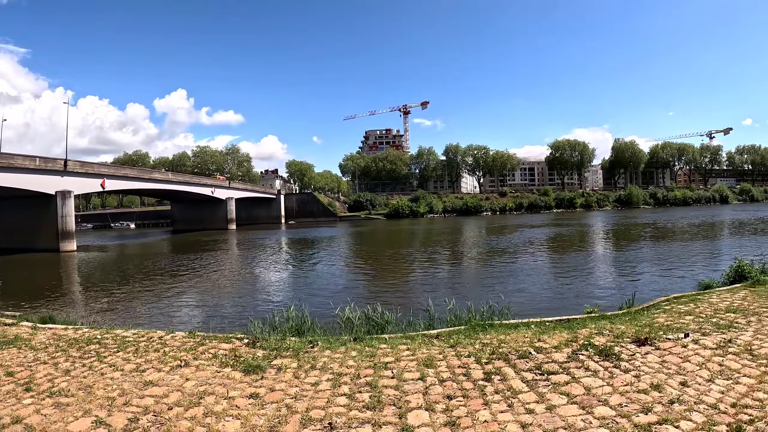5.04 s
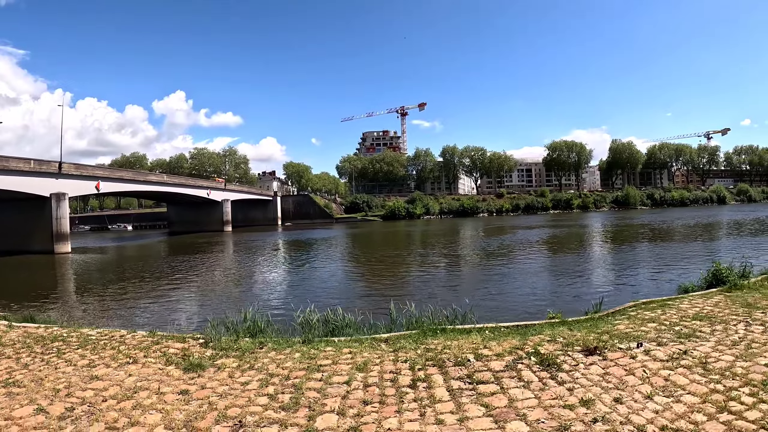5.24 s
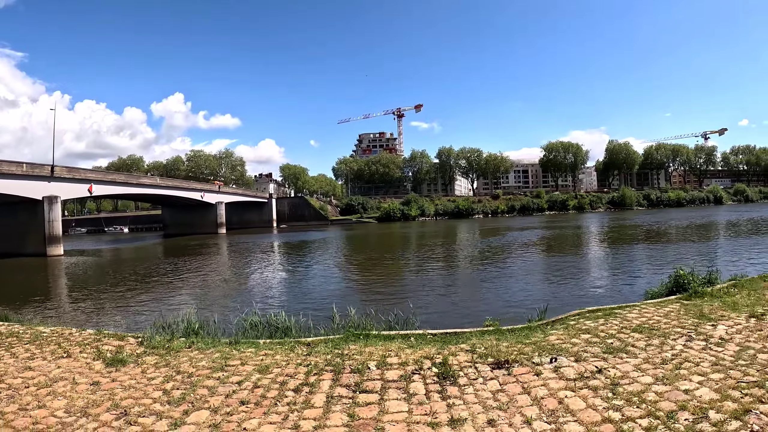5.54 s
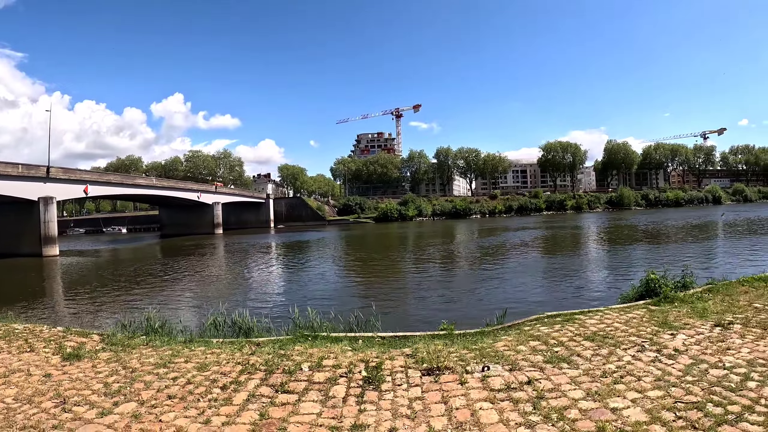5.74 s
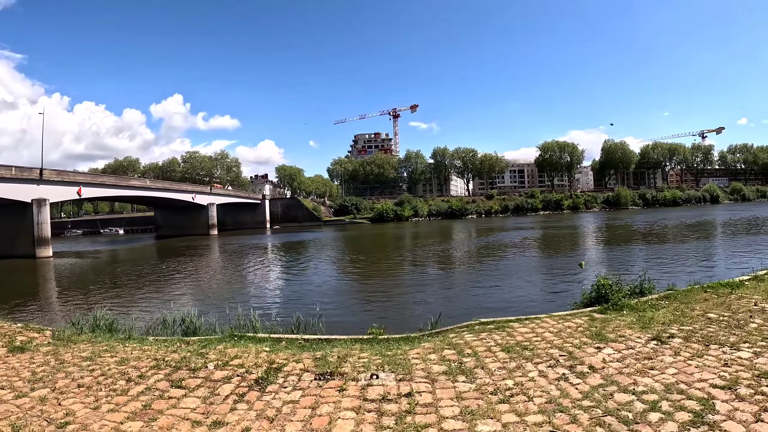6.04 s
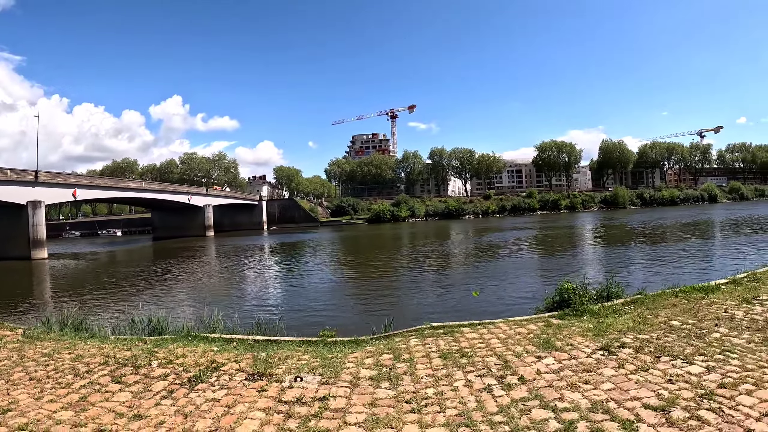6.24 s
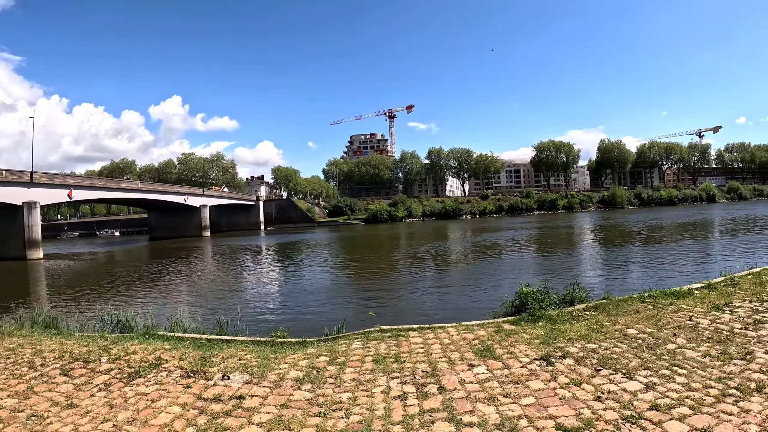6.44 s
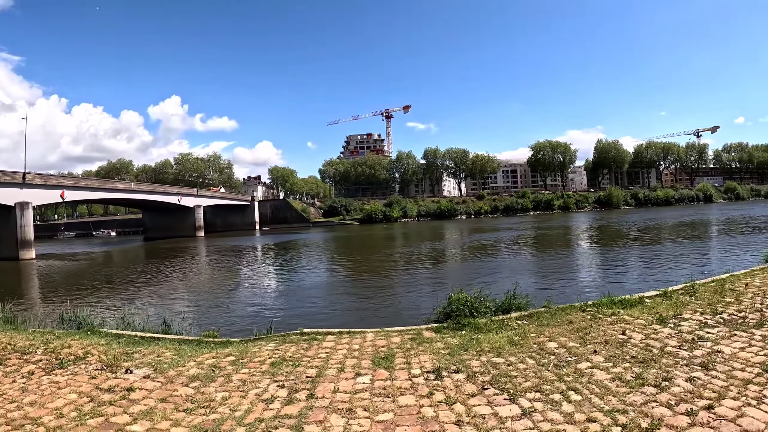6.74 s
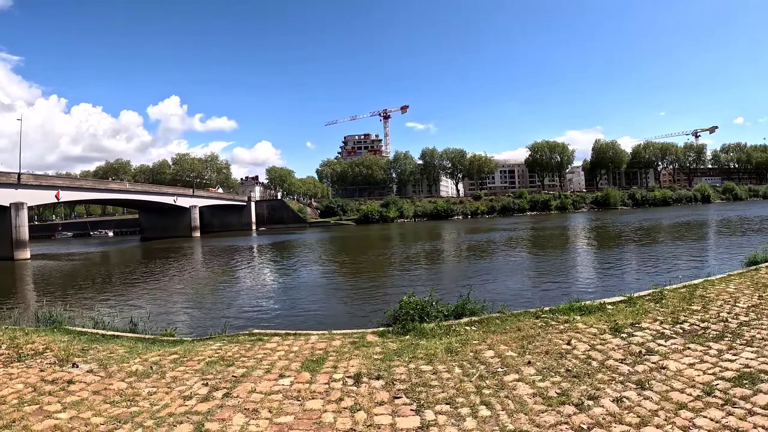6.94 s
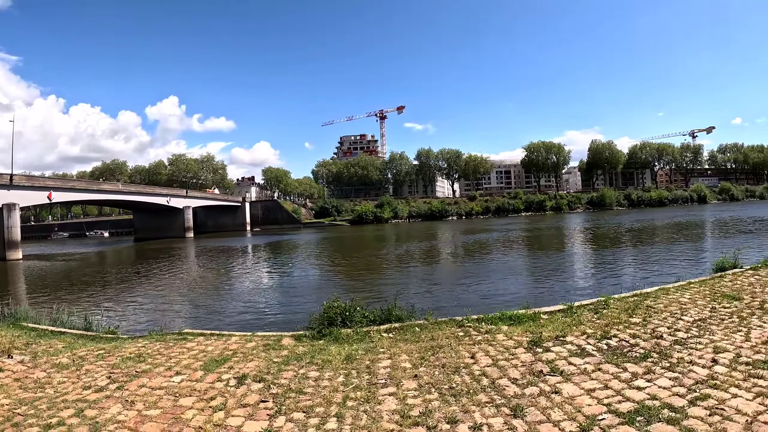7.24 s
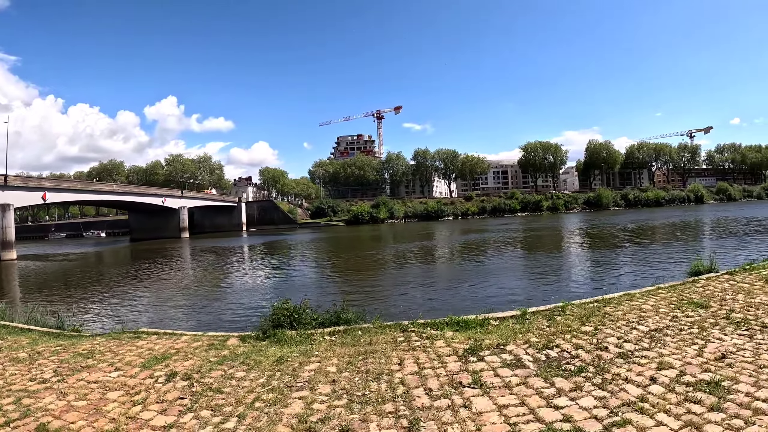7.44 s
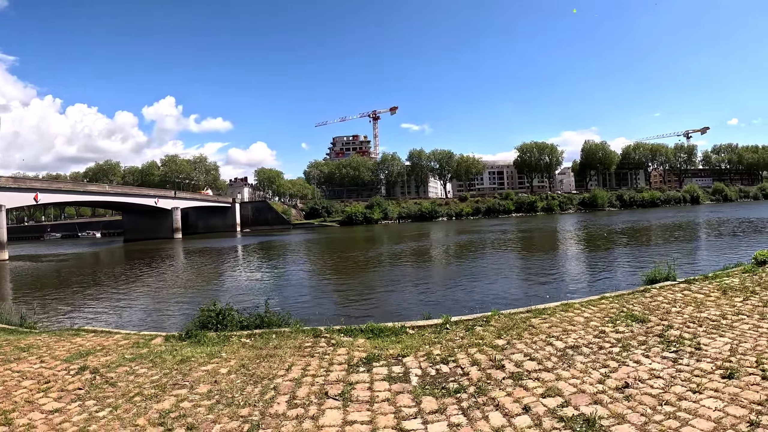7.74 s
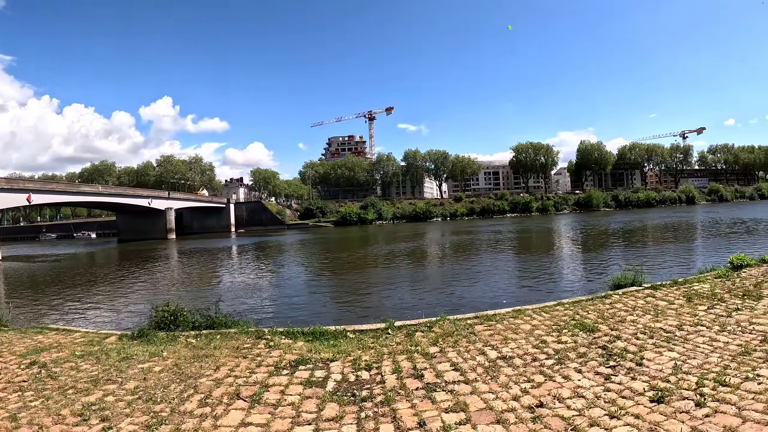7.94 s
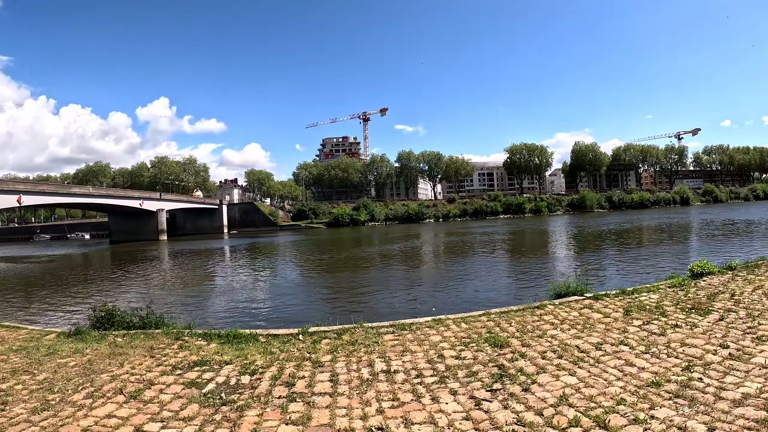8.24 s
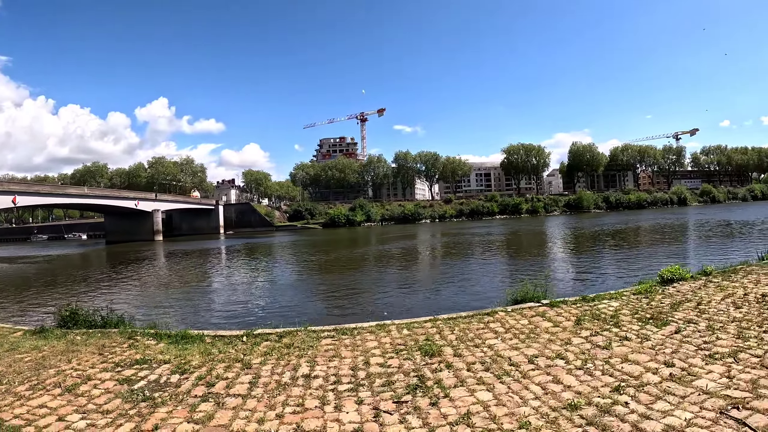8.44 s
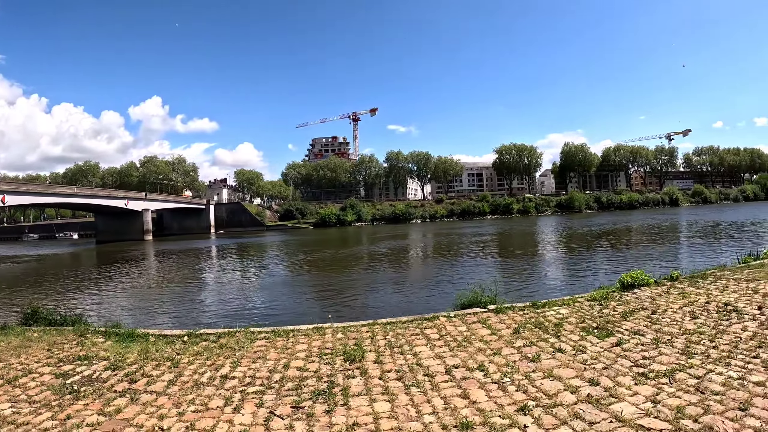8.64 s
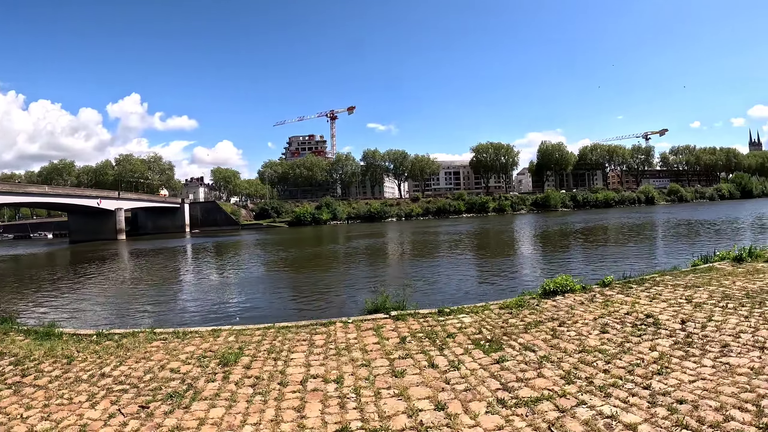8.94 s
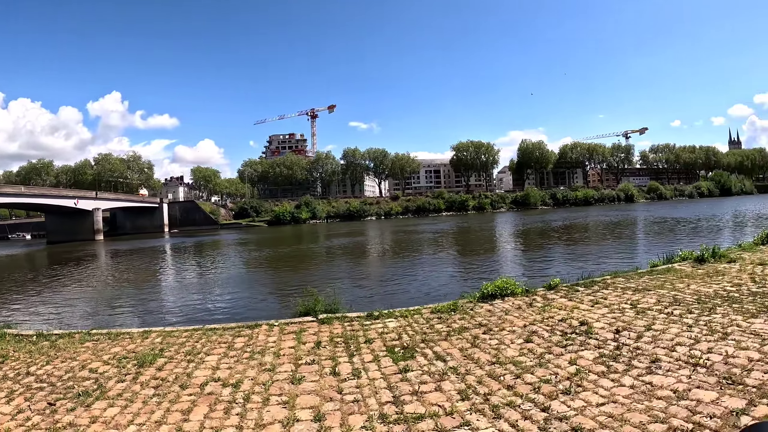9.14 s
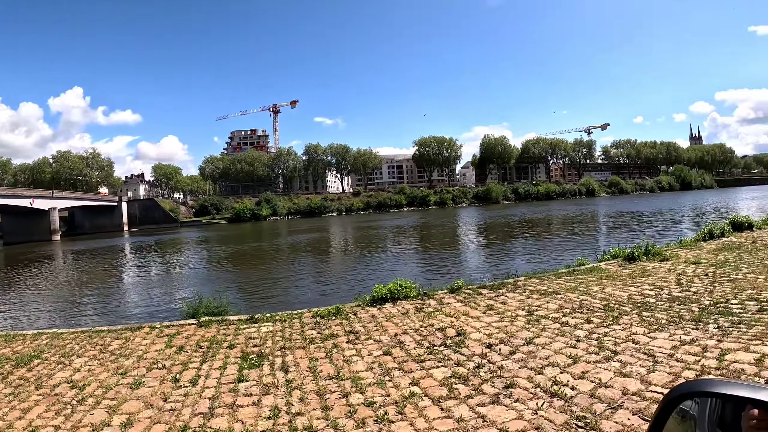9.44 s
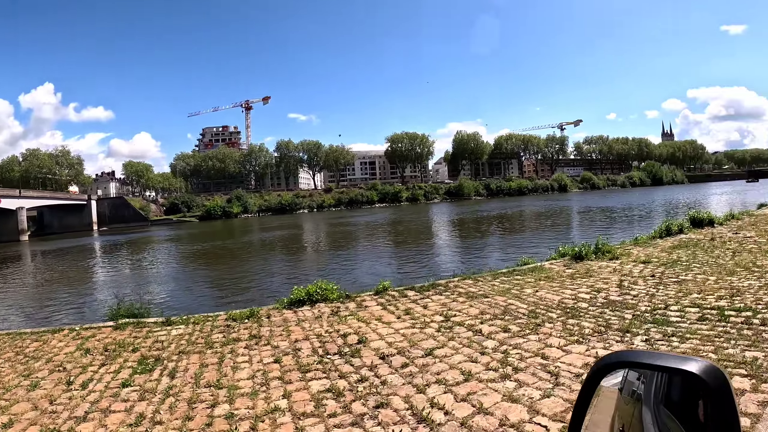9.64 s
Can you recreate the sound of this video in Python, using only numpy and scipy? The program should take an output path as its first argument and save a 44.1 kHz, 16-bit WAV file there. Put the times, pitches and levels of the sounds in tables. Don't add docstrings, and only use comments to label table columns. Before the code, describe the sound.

From inside a car with an open window, a faint low engine hum emerges from silence. Around two seconds the wheels begin to roll harder over cobblestones: booming bass, stony rumble, tyre roar and gritty hiss. Thumps, hollow knocks and a sharp metallic click punctuate it, while the engine climbs steadily. The close microphone is slightly overloaded by the bass.

```python
import sys
import numpy as np
from scipy import signal
from scipy.io import wavfile
from scipy.ndimage import uniform_filter1d

SR = 44100
rng = np.random.default_rng(int(sys.argv[2]) if len(sys.argv) > 2 else 0)


def to_wav(sig):
    pcm = np.clip(np.atleast_2d(sig), -1, 1) * 32767
    pcm = np.round(pcm).astype(np.int16)
    wavfile.write(sys.argv[1], SR, pcm.T)


def decibels_to_gain(level_db):
    exponent = np.asarray(level_db, float) / 20
    return 10 ** exponent


N = 432180
T = np.arange(N) / SR

# t/s, tyre roar level/dB, roughness level/dB
ROAD_LEVELS = [(0, -91, -71), (0.11, -62, -49.5), (0.3, -58.5, -46), (1.03, -53.5, -41), (1.5, -47.5, -40),
               (2.07, -41.5, -30.5), (2.45, -40, -27.5), (2.8, -40.5, -31), (3.35, -36.5, -31.5),
               (3.8, -37.5, -27), (4.3, -41.5, -30.5), (5.2, -44.5, -33), (5.6, -39.5, -29),
               (6.6, -39, -34.5), (7.3, -36, -31.5), (8.28, -43, -31.5), (8.43, -39, -29.5),
               (9.8, -44.5, -30.5)]
# f/Hz, width/Hz, level/dB
SPRING_MODES = [(16.14, 6.46, -5), (26.16, 13.6, -9), (10.3, 12.4, -7.5)]
# t/s, lift/dB, half length/s
BODY_HEAVES = [(0.44, 12, 0.082), (1.03, 6, 0.084), (1.45, 9.5, 0.08), (2.09, 4.5, 0.19), (2.29, 1, 0.023),
               (0.3, 4, .08), (0.92, 7, 0.04), (2.64, 6, 0.062), (2.98, 11, 0.034), (3.6, 2.5, 0.13),
               (3.98, 7, 0.073), (4.15, 11, 0.062), (4.45, 8, 0.14), (4.86, 10.5, 0.27), (5.38, 2, 0.055),
               (5.59, 8, 0.056), (5.83, 7, 0.11), (6.22, 6.5, 0.22), (6.52, 7, 0.27), (6.95, 5.5, 0.1),
               (7.3, 2.5, 0.38), (7.7, 7.5, 0.15), (8.13, 0.5, 0.055), (8.33, 9, 0.054), (8.79, 6.5, 0.11),
               (9.33, 6.5, 0.069), (9.72, 10.5, 0.024)]
# t/s, lift/dB, half length/s
STONE_RUNS = [(1.42, 3.5, 0.17), (2.07, 2, .06), (2.35, -4.5, 0.079), (2.67, 4, 0.076), (2.9, 10, 0.083),
              (3.14, 9.5, .04), (3.28, 10, 0.069), (3.72, 1.5, 0.07), (4.09, 5, 0.039), (4.31, 0, 0.04),
              (4.86, 8, 0.032), (5.45, 2.5, .08), (5.7, 8, 0.043), (5.95, 7.5, 0.063), (6.19, 4, .05),
              (6.35, 7.5, 0.042), (6.75, 1.5, 0.025), (7.3, 4.5, 0.24), (7.8, 0, .06), (8.14, 3, 0.058),
              (8.37, 2.5, 0.19), (9.2, 1.5, 0.25), (9.42, 0, 0.079), (9.64, 2, 0.094)]
# t/s, lift/dB, half length/s
SANDY_STRETCHES = [
    (2.4, 3, 0.17),
    (3.62, 1.5, 0.14),
    (5.7, 0.5, 0.46),
    (6.65, 2, 0.39),
]
# t/s, lift/dB, half length/s
ROAR_SWELLS = [
    (3.4, 2, 0.037),
    (3.48, 2, 0.033),
    (8.4, 1, 0.026),
    (8.5, 2, 0.05),
    (2.1, 3, 0.035),
    (7.3, 0.5, 0.056),
]
# t/s, lift/dB, half length/s
RATTLE_BURSTS = [(1.485, 12, .02), (1.525, 12, .025), (1.575, 11, .03), (1.63, 6, .02), (2.09, 6, .03),
                 (2.428, 21, 0.026), (2.51, 8, .03), (3.47, 10, .02), (3.89, 6, .02), (4.03, 6, .02),
                 (4.545, 11, .02), (5.5, 6, .02), (5.82, 4, .03), (7.3, 8, .025), (7.615, 7, .02)]
# f/Hz, density level/dB per Hz
RUMBLE_SPECTRUM = [(25, -26.5), (40, 8.5), (90, -0.5), (140, -2), (220, -7), (300, -11), (450, -21),
                   (800, -26.5), (1500, -70.5)]
# f/Hz, density level/dB per Hz
ROAR_SPECTRUM = [(180, -22), (300, -6), (636, -10), (779, -11.5), (857, -8), (1220, -11), (1730, -17.5),
                 (1890, -15.5), (2380, -24), (3000, -28.5), (3900, -61.5), (6600, -120)]
# f/Hz, density level/dB per Hz
GRIT_SPECTRUM = [(1500, -17), (2500, -5.5), (3000, -0.5), (3800, -3.5), (5700, -14.5), (6500, -15.5),
                 (7500, -22.5), (8500, -17), (9300, -27), (11000, -34), (11600, -72.5), (17000, -98.5)]
# f/Hz, density level/dB per Hz
RATTLE_SPECTRUM = [(2500, -18.5), (4500, -3), (8500, -4), (11000, -13), (11800, -29.5), (15500, -26.5),
                   (17000, -69)]
# t/s, peak level/dB, f/Hz
WHEEL_THUMPS = [(2.614, -17, 136), (2.802, -4, 110), (2.858, -7, 90), (2.901, -24, 110), (2.926, -4.5, 124),
                (3.024, -23, 137), (3.152, -17, 108), (3.245, -26, 110), (3.299, -11, 110),
                (3.592, -27, 116), (3.932, -12, 113), (5.489, -27, 118), (5.677, -11, 110),
                (5.838, -7.5, 146), (5.901, -11, 110), (5.929, -16, 129), (5.957, -1.5, 130),
                (5.553, -6, 150), (6.191, -1.5, 100), (6.231, -5, 95), (6.312, -7, 110), (6.358, -10, 110),
                (6.961, -5.5, 127), (7.097, -42, 129), (8.363, -9, 138), (8.41, -6.5, 130),
                (8.778, -31, 141), (9.297, -4.5, 110), (1.987, -27, 160), (2.235, -27, 186),
                (2.994, -9.5, 250), (3.107, -17, 186), (3.122, -14, 230), (3.223, -5.5, 150),
                (3.622, -22, 172), (3.972, -17, 230), (4.183, -12, 186), (4.72, -18, 190),
                (4.809, -17, 180), (4.838, -19, 196), (5.091, -15, 160), (5.121, -19, 175),
                (5.655, -14, 200), (5.693, -22, 220), (5.785, -19, 240), (5.945, -25, 260),
                (5.965, -14, 280), (5.984, -21, 240), (6.292, -22, 240), (6.848, -18, 250),
                (7.606, -14, 196), (7.949, -16, 250), (7.986, -17, 156), (8.616, -23, 290),
                (8.678, -12, 250), (9.394, -16, 250), (9.573, -20, 260)]
# t/s, peak level/dB, ring f/Hz, level/dB of the rattle after the blow
TRIM_KNOCKS = [(1.516, -22.5, 920, -16), (1.752, -14.5, 1110, -7), (1.952, -25, 790, -18),
               (2.172, -18.5, 1040, -10), (2.431, -18.5, 900, -3), (2.462, -28, 720, 4),
               (2.608, -24, 840, 7.5), (2.769, -20.5, 926, -11), (3.044, -19, 560, -2),
               (3.142, -24, 436, -12), (3.253, -13, 480, -9), (3.273, -10, 403, -15), (3.326, -18, 420, -4),
               (3.397, -26, 980, 7.5), (3.473, -32, 770, 0), (3.861, -12.5, 900, -3.5),
               (3.863, -11, 454, -7.5), (3.95, -22, 382, -3), (4.185, -25, 500, -12),
               (4.335, -24, 450, -10), (4.81, -22, 380, -13), (4.899, -19.5, 560, -9),
               (3.99, -16.5, 520, -7.5), (4.021, -12, 413, -15), (4.764, -24, 394, -12),
               (4.898, -21, 930, 3), (5.505, -21, 450, -6), (5.681, -10.5, 637, -12),
               (5.845, -17.5, 360, -4), (5.935, -10, 432, -9), (5.947, -19, 400, -10),
               (5.973, -21, 453, -4), (6.347, -27, 552, -7), (6.357, -15, 340, -11), (7.056, -23, 800, -4),
               (8.392, -15.5, 400, -18)]
# t/s, peak level/dB, top end level/dB
LOOSE_TICKS = [(1.263, -50, -40), (1.519, -46, -20), (1.6286, -46.5, -20), (1.7522, -34, -22),
               (2.0938, -40, -30), (1.475, -48, -17), (2.416, -28, -19), (2.428, -29, -21),
               (2.4317, -25, -17), (2.4527, -37, -18), (2.502, -47, -9), (2.52, -48.5, -8),
               (2.5576, -39.5, -27), (3.047, -40, -33), (3.3, -42, -27), (3.393, -38, -23),
               (3.4654, -39, -16), (3.474, -31, -23), (3.862, -40, -17), (3.885, -37.5, -16.5),
               (4.029, -42, -14), (4.537, -38.5, -29), (4.55, -42, -22), (4.7283, -44, -20),
               (5.808, -43, -16), (7.2824, -41, -26), (7.613, -35, -18), (8.04, -42.5, -17),
               (9.0987, -40.5, -30), (9.5167, -45, -13), (1.2377, -60, -40), (1.658, -52, -22),
               (2.1277, -44, -25), (2.1716, -48, -25), (2.461, -40, -22), (2.4965, -50.5, -8),
               (2.511, -46, -14), (3.2816, -41, -25), (4.0074, -41, -20), (4.3192, -48, -9),
               (4.569, -45, -25), (4.9009, -47, -20), (6.3855, -49, -25), (7.292, -43, -20),
               (7.304, -42, -21), (7.313, -44, -18), (7.415, -47, -20), (7.443, -43, -20),
               (7.607, -40, -25), (7.622, -43, -18), (9.7294, -53, -20)]
# t/s, peak level/dB, ring f/Hz, t60/s
METAL_CHINKS = [(2.07, -55, 6100, 0.055), (2.094, -36, 3200, 0.022), (2.4318, -17.5, 4440, 0.006),
                (2.437, -35, 3500, .015), (2.4315, -23, 5500, 0.008), (2.455, -35, 4270, .015),
                (1.263, -48, 3960, .015), (1.752, -24, 1500, 0.04), (4.899, -31, 1350, .03),
                (2.173, -31, 1030, .035), (5.6, -32, 800, .02), (3.474, -30, 750, 0.018),
                (1.598, -54, 5200, 0.014), (1.659, -52, 4500, .015), (4.03, -47, 4200, 0.015),
                (4.102, -50, 3570, .03), (4.317, -44, 5200, 0.021), (4.536, -38.5, 3100, 0.032),
                (7.283, -51, 4940, .02)]
# t/s, firing rate f/Hz
FIRING_RATE = [(0.0, 46.11), (0.6, 45.35), (1.3, 44.1), (2.0, 43.56), (2.7, 44.62), (3.3, 47.2),
               (3.9, 49.43), (4.5, 51.94), (5.2, 54.97), (6.0, 58.69), (6.9, 61.92), (7.8, 64.71),
               (8.8, 66.48), (9.8, 67.34)]
# t/s, hum level/dB, intake ring level/dB
ENGINE_EFFORT = [(0, -92, -110), (0.1, -60, -86), (0.25, -39, -70.5), (1.4, -39, -61.5), (2.0, -32, -53.5),
                 (2.6, -27, -53), (3.0, -26, -48.5), (3.5, -25.5, -44), (4.2, -25, -49.5),
                 (4.7, -27.5, -48), (5.4, -27, -54), (5.9, -24.5, -46), (6.6, -23, -50), (7.0, -21, -45),
                 (7.5, -21.5, -48), (8.2, -22.5, -45), (8.9, -21.5, -46), (9.8, -23.5, -49)]
# f/Hz, level/dB
SHELL_RESPONSE = [(85, 18), (135, 2), (170, -7), (188, -2), (200, -19), (220, 5), (265, 1.5), (330, -6),
                  (400, -6.5), (470, -5.5), (530, -20), (700, -19)]
# f/Hz, width/Hz, level/dB
PIPE_MODES = [(779, 63, 3), (1178, 90, -10)]
# from t/s, to t/s, share of strips
TOP_SURVIVES = [(1.47, 1.65, .6), (1.74, 1.78, .9), (1.93, 2.1, .5), (2.36, 2.72, .9), (2.83, 2.92, 1),
                (2.92, 2.98, .5), (3.2, 3.75, .35), (4.0, 4.1, .6), (4.2, 4.65, .45), (4.85, 5.55, .4),
                (5.64, 5.72, .4), (5.8, 5.93, 1), (6.17, 6.24, 1), (6.45, 6.6, .4), (7.27, 7.33, .4),
                (7.52, 7.67, .35), (7.9, 8.1, .6), (8.2, 8.35, .45), (8.37, 8.45, 1), (8.45, 8.55, .6),
                (8.67, 8.72, .4), (8.8, 8.82, 1), (8.84, 8.92, .4), (9.2, 9.3, .4), (9.37, 9.55, .7),
                (9.6, 9.73, .6)]


def evened(x):
    return x / np.sqrt(np.mean(x ** 2) + 1e-20)


def curves(rows):
    s, *columns = np.transpose(rows)
    return [np.interp(T, s, c) for c in columns]


def lifts(rows):
    return sum(db * np.exp(-((T - s) / max(half, 0.02)) ** 2) for s, db, half in rows)


def add(mix, s, sound):
    part = mix[round(s * SR):][:len(sound)]
    part += sound[:len(part)]


def resonate(x, hz, width_hz):
    turn = np.exp(2j * np.pi * hz * np.arange(len(x)) / SR)
    r = np.exp(-np.pi * width_hz / SR)
    return 2 * (turn * signal.lfilter([1 - r], [1, -r], x / turn)).real


def band(x, lo_hz, hi_hz):
    sos = signal.butter(2, [lo_hz, min(hi_hz, 20000)], "band", fs=SR, output="sos")
    y = signal.sosfilt(sos, x)
    return y / abs(y).max()


def wander(hz):
    smoother = signal.butter(1, hz, fs=SR / 100, output="sos")
    coarse = signal.sosfiltfilt(smoother, rng.standard_normal(N // 100 + 2))
    return np.interp(np.arange(N) / 100, np.arange(len(coarse)), evened(coarse))


def noise(spectrum, patchy_db, flicker_db, size):
    hz = np.fft.rfftfreq(size, 1 / SR)
    frames = 4 * N // size + 5
    a, b, patches = rng.standard_normal((frames, len(hz), 3)).T
    patches = uniform_filter1d(patches, size=8, axis=0)
    patches = evened(uniform_filter1d(patches, size=6, axis=1))
    flicker = evened(uniform_filter1d(rng.standard_normal(frames), size=3))
    f, level_db = np.transpose(spectrum)
    colour_db = np.interp(np.log(hz + 1), np.log(f + 1), level_db)[:, None]
    z = (a + 1j * b) * decibels_to_gain(colour_db + patchy_db * patches + flicker_db * flicker)
    x = signal.istft(z, nperseg=size, noverlap=3 * size // 4)[1]
    return evened(x[:N])


def suspension_boom(rough_db):
    level_db = -24.5 + 1.57 * (rough_db + 31) + lifts(BODY_HEAVES)
    shake = rng.standard_normal((len(SPRING_MODES), N))
    boom = 0
    for x, (hz, width_hz, db) in zip(shake, SPRING_MODES):
        boom = boom + decibels_to_gain(db) * evened(resonate(resonate(x, hz, width_hz), hz, width_hz))
    boom = evened(boom)
    boom = boom / np.sqrt(uniform_filter1d(boom ** 2, size=9000) + 0.29)
    return decibels_to_gain(level_db) * boom


def stone_rumble(rumble_db):
    return decibels_to_gain(rumble_db + 0.5) * noise(RUMBLE_SPECTRUM, patchy_db=1.0, flicker_db=1.5, size=1024)


def tyre_roar(roar_db):
    return decibels_to_gain(roar_db - 2.3) * noise(ROAR_SPECTRUM, patchy_db=1.06, flicker_db=-0.3, size=512)


def grit_hiss(rolling_db):
    level_db = -57.85 + 1.02 * (rolling_db + 40) + lifts(SANDY_STRETCHES)
    return decibels_to_gain(level_db) * noise(GRIT_SPECTRUM, patchy_db=1.0, flicker_db=0.8, size=1024)


def fine_rattle(rumble_db, roar_db):
    level_db = 0.9 * (rumble_db + 29.5) + 0.35 * (roar_db + 40.0) - 76 + lifts(RATTLE_BURSTS)
    return decibels_to_gain(level_db) * noise(RATTLE_SPECTRUM, patchy_db=3.0, flicker_db=2.5, size=1024)


def road():
    rolling_db, rough_db = curves(ROAD_LEVELS)
    stones_db = lifts(STONE_RUNS)
    rumble_db = rough_db + stones_db
    roar_db = rolling_db + 0.15 * stones_db + lifts(ROAR_SWELLS)
    floor = suspension_boom(rough_db) + stone_rumble(rumble_db)
    return floor + tyre_roar(roar_db) + grit_hiss(rolling_db) + fine_rattle(rumble_db, roar_db)


def thumps():
    out, t = np.zeros(N), np.arange(3000) / SR
    for s, db, hz in WHEEL_THUMPS:
        pulse = np.exp(-((t - 0.006) * hz * 2.9) ** 2)
        push = band(pulse, 0.9 * hz, 5.0 * hz)
        add(out, s, decibels_to_gain(db - 11.5) * rng.choice([-1, 1]) * push)
    return out


def knocks():
    out, t = np.zeros(N), np.arange(4000) / SR
    t60 = 0.082
    puffs = rng.standard_normal((len(TRIM_KNOCKS), len(t)))
    for (s, db, hz, rattle_db), puff in zip(TRIM_KNOCKS, puffs):
        pulse = np.exp(-((t - 0.0035) * hz * 2.96) ** 2)
        blow = band(pulse, 0.67 * hz, 2.8 * hz)
        decay = decibels_to_gain(-60 * t / t60 * (hz / 600) ** 0.5)
        puff = puff * decay * np.minimum(t / 0.0053, 1)
        rattle = band(band(puff, 0.69 * hz, 1.43 * hz), 290, 5200)
        add(out, s - 0.002, decibels_to_gain(db - 6.0) * (blow + decibels_to_gain(rattle_db) * rattle))
    return out


def ticks():
    out, t = np.zeros(N), np.arange(3000) / SR
    ring_hz, t60 = 3800, 0.024
    puffs = rng.standard_normal((len(LOOSE_TICKS), len(t)))
    for (s, db, top_db), puff in zip(LOOSE_TICKS, puffs):
        puff = puff * decibels_to_gain(-60 * t / t60) * np.minimum(t / 0.0014, 1)
        ring = band(band(puff, 0.35 * ring_hz, 0.85 * ring_hz), 2200, 11000)
        ring = ring + 0.33 * band(band(puff, 2000, 7000), 2000, 7000)
        top = band(band(puff, 7500, 13000), 8000, 12000)
        top = top + 0.3 * band(puff, 12000, 15500)
        add(out, s, decibels_to_gain(db - 1.0) * (ring + decibels_to_gain(top_db + 2.0) * top))
    return out


def chinks():
    out, t = np.zeros(N), np.arange(3000) / SR
    for s, db, hz, t60 in METAL_CHINKS:
        decay = decibels_to_gain(db - 60 * t / max(t60, 0.004))
        rise = np.minimum(t / (0.07 * t60), 1)
        add(out, s, decay * rise * np.sin(2 * np.pi * hz * t))
    return out


def engine_orders(hz, turns, hum_db):
    load_db = hum_db - 27.5 + 0.5037 * np.maximum(hz - 55, 0)
    drone_db = 4.5 * np.clip(2 * (2.1 - T) + 0.5, 0, 1)
    f, shell_db = np.transpose(SHELL_RESPONSE)
    orders = 0
    for k in range(2, 11):
        order_db = np.interp(k * hz, f, shell_db) + 1.5 * wander(hz=8.3)
        if k in (5, 6):
            order_db = order_db + drone_db
        orders = orders + decibels_to_gain(load_db + order_db) * np.sin(2 * np.pi * (k * turns + rng.random()))
    return orders


def intake_pipes(turns, pipe_db):
    pulses = sum(np.cos(2 * np.pi * k * turns) for k in range(9, 30))
    pulses = pulses * decibels_to_gain(0.51 * wander(hz=29))
    driven = evened(pulses) + 0.9 * 4 * rng.standard_normal(N)
    pipes = 0
    for hz, width_hz, db in PIPE_MODES:
        pipes = pipes + decibels_to_gain(db) * resonate(resonate(driven, hz, width_hz), hz, width_hz)
    return decibels_to_gain(pipe_db - 0.4 + 1.5 * wander(hz=4.2)) * evened(pipes)


def engine():
    hz = uniform_filter1d(curves(FIRING_RATE)[0], size=15000)
    hum_db, pipe_db = curves(ENGINE_EFFORT)
    turns = np.cumsum(hz * (1 + 0.002 * wander(hz=5.44))) / SR
    hum = decibels_to_gain(hum_db + 0.45 * wander(hz=5.6)) * np.sin(2 * np.pi * turns)
    return np.sqrt(2) * (hum + engine_orders(hz, turns, hum_db)) + intake_pipes(turns, pipe_db)


def scene():
    return (road() + thumps() + knocks() + ticks() + chinks() + engine())[None]


def top_in_patches(x):
    edge_hz, calm_share = 11200, 0.07
    hz, t, z = signal.stft(x[0], SR, nperseg=1024)
    share = calm_share * (t > 1)
    share = share + sum((t > a) * (t < b) * part for a, b, part in TOP_SURVIVES)
    height = np.clip((hz[:, None] - edge_hz) / 4500, 0, 1)
    chance = share ** (0.6 + 2.6 * height) + np.exp(-30 * height)
    dice = np.kron(rng.random((len(t) // 3 + 1, 103)).T, np.ones((5, 3)))[:len(hz), :len(t)]
    top = hz[:, None] > edge_hz
    power = (abs(z) ** 2 * top).sum(0)
    loud_crack = power > 30 * np.median(power)
    kept = ~top | (dice < chance) | loud_crack
    return signal.istft(z * kept, SR, nperseg=1024)[1][None, :N]


def top_cut(x):
    return signal.sosfilt(signal.butter(12, 15700, fs=SR, output="sos"), x)


def record(dry):
    bass = signal.sosfiltfilt(signal.butter(2, 150, fs=SR, output="sos"), dry)
    limit = 0.37
    squashed = limit * np.tanh(1.086 * bass / limit)
    fade = np.clip(T / 0.08, 0, 1) * np.clip((T[-1] - T) / 0.008, 0, 1)
    heard = fade * (dry - bass + squashed - 0.001)
    return top_cut(top_in_patches(heard))


dry = scene()
out = record(dry)
to_wav(out)
```